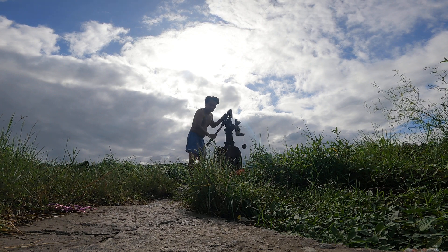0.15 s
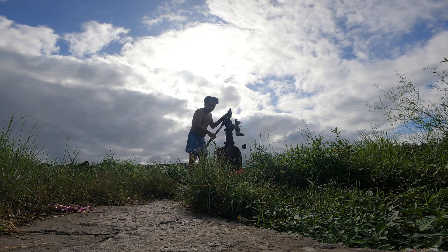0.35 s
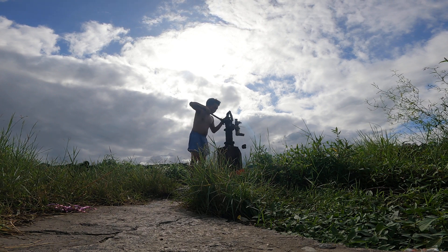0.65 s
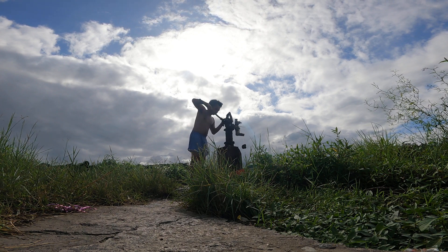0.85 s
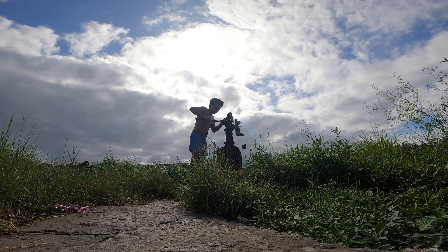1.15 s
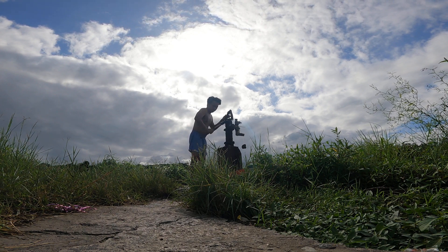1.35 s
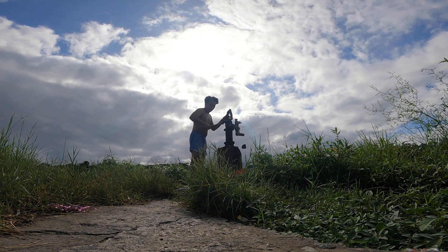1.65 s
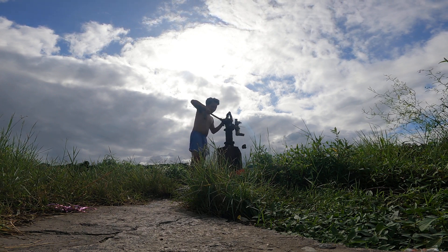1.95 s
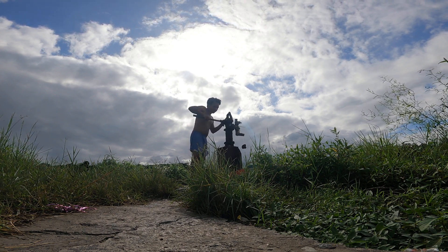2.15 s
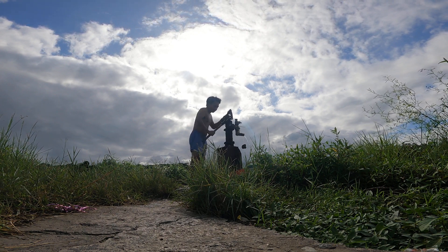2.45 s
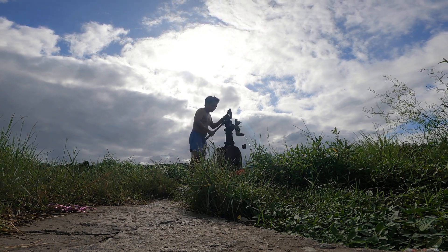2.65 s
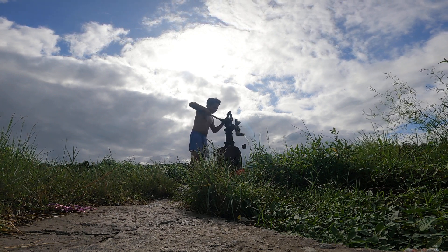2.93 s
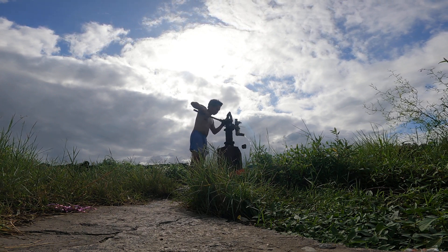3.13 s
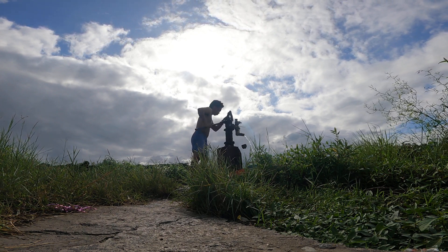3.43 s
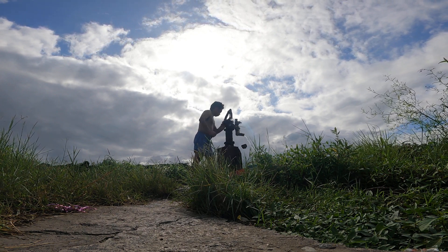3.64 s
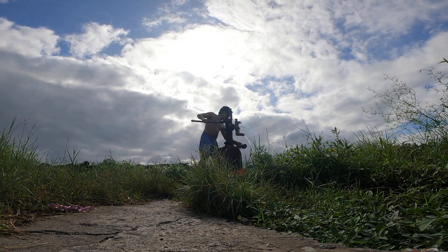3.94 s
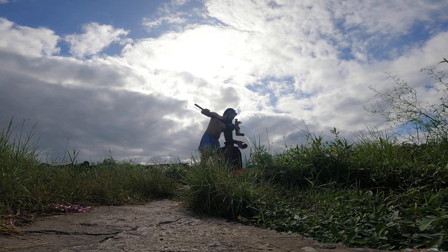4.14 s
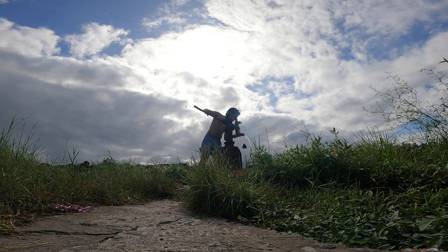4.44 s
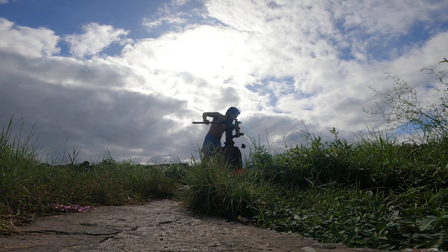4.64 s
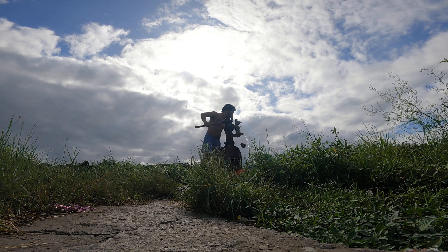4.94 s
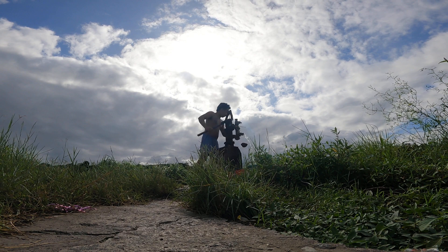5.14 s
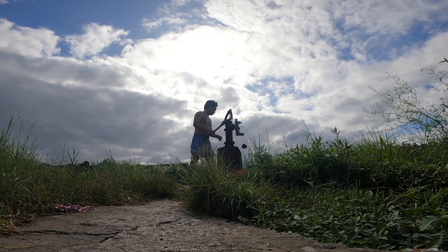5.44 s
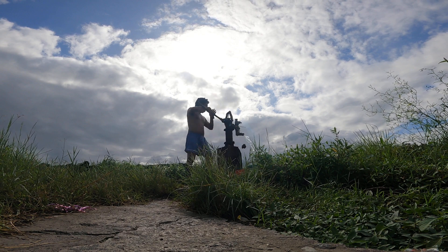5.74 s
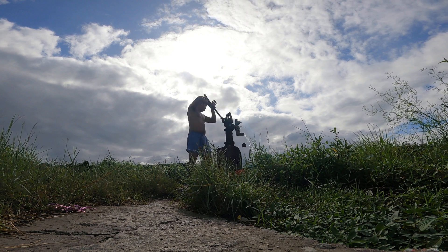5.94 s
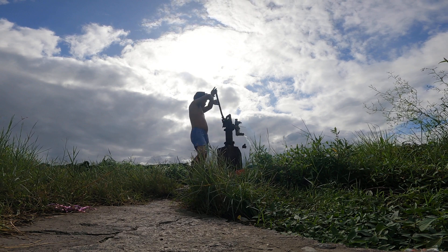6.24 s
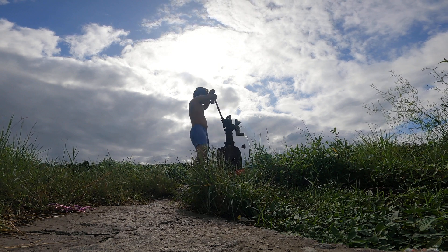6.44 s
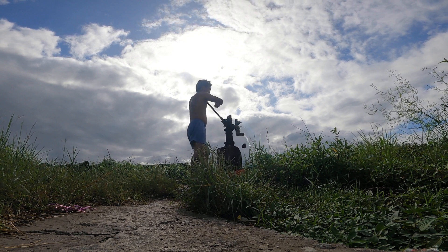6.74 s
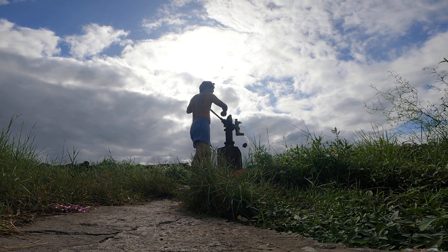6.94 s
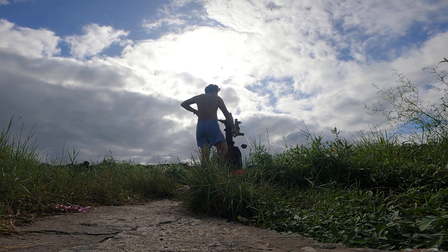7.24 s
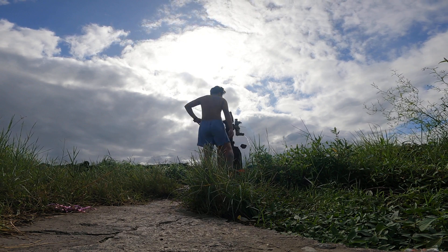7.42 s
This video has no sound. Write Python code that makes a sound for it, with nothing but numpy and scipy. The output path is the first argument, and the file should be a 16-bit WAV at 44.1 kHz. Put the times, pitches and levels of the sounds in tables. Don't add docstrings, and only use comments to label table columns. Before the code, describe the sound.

An old iron hand pump in an open field, dry and nearly echo-free, slightly right of centre, with low wind rumbling at the microphone. After a faint drip, a hard clank at 0.35 s starts a burst of rattling, ticks and hollow low glugs, with a thin squeak near 0.7. More strokes clank around 1.2, then densely from 1.6 to 2.4 and 2.7 to 3.5, with a piercing squeal at 2.9. A short gust comes near 3.45; drops begin pattering on stone from 3.6. Clanks return at 4 to 4.75 while water splats and the air column hums. Around 5.2 to 5.5 the iron pauses: splashes thicken and one big gulp sounds at 5.35. Sharp clanks and a squeak at 5.6 to 5.9, then lighter knocks and a surge of water at 6.4 to 6.9. It ends with drips, trickling and faint high squeaks until 7.6.

```python
import sys
import numpy as np
from scipy import signal
from scipy.fft import rfft, irfft, next_fast_len
from scipy.io import wavfile
from scipy.ndimage import uniform_filter1d

SR = 44100
rng = np.random.default_rng(int(sys.argv[2]) if len(sys.argv) > 2 else 0)


def digitize_waveform(pressure):
    field = np.atleast_2d(pressure).T
    bounded = np.clip(field, -1, 1)
    quanta = np.round(bounded * 32767).astype(np.int16)
    wavfile.write(sys.argv[1], SR, quanta)


def rack_gain(trim_db):
    fader = np.asarray(trim_db, float)
    return 10 ** (fader / 20)


N = 334278

# pitch_hz, level_db, t60_s
LEVER_MODES = [(3300, -8.5, 0.019), (3560, -6.5, 0.079), (3847, -11.5, 0.12), (3820, -7, 0.0071),
               (4226, -2, 0.1), (4420, 1, 0.037), (4620, -1, 0.04), (4814, 0, 0.045), (5240, -11.5, 0.02)]
ROD_MODES = [(6020, -15, .06), (6390, -8, .1), (6565, -9, .15), (6735, 0, .22), (6838, -3, .15),
             (7330, -17, .07)]
PIN_MODES = [(7640, -9, .05), (8120, -7, .08), (8883, -2, .4), (9318, -11, .12), (10280, -15, .06),
             (10620, -17, .08), (11473, -9, .2), (12000, -14, .12), (12526, -6, .25), (13500, -17, .12),
             (14700, -18, .12)]
# freq_hz, level_db
SCRAPE_COLOUR = [(300, -20), (1000, -11), (2000, -14.5), (3200, -10), (4400, 1), (5400, -20.5),
                 (6700, -6.5), (8500, -10), (12000, -22), (15500, -73)]
# time_s, level_db
GRIP = [
    (4.25, 3),
    (4.45, -3.5),
]
# start_s, peak_db,
# rod_ring_db
CLANKS = [(0.3516, -5.5, -5), (0.62, -11.5, -31), (0.6725, -11, -17), (1.1615, -6.5, -18),
          (1.6262, -10.5, -21), (1.7677, -9, 7), (1.7893, -9.5, -30), (1.8648, -11.5, -15), (1.957, -7, -8),
          (2.1839, -14, -14), (2.2657, -7, -20), (2.6862, -7, -24), (2.8303, -10.5, -2.5), (2.851, -14, -39),
          (2.8727, -9.5, -39), (1.6135, -8.5, -12), (2.9888, -10, -8), (3.3182, -9, -27), (3.3802, -16, -9),
          (3.4375, -14.5, -6), (3.9781, -8, -16.5), (4.0422, -8.5, -20), (4.124, -7.5, -19),
          (4.582, -11.5, -21), (4.672, -8, -14), (4.7332, -13, -3), (5.6356, -11.5, -2), (5.7017, -5.5, -31),
          (5.8496, -6, -3), (6.5863, -13, -11), (5.647, -8.5, -16), (5.869, -9.5, -32), (6.9347, -39, -8),
          (6.7032, -32, -6), (2.692, -14.5, -20), (2.274, -10.5, -11), (1.6195, -9.5, -12),
          (0.4298, -22, -23), (0.462, -20.5, -8), (0.561, -17, -8), (0.5992, -13, -30), (0.707, -16.5, -30),
          (0.812, -22.5, 18), (1.138, -18, -37), (1.2092, -14, 7), (1.259, -24.5, -4), (1.7526, -16.5, -26),
          (2.0389, -24, 3), (2.123, -18.5, -12), (2.225, -16.5, -31), (2.327, -15.5, -10),
          (2.3586, -18, -14), (2.3946, -26, -23), (2.592, -26, -7), (2.753, -16, 2), (3.085, -25.5, 6),
          (3.295, -17, -47), (3.486, -17.5, -4), (3.8773, -24.5, -15), (4.084, -29, -8), (4.5469, -24, -1),
          (4.6495, -20, -20), (6.209, -18, -38), (6.428, -16, -28), (6.558, -15, -28), (6.871, -20, -19),
          (6.9077, -20, -16), (0.3461, -15.5, -24), (0.368, -37, -8), (0.408, -36, -6), (0.479, -40, -14),
          (2.673, -33, -24), (2.681, -13, -8), (2.9042, -8.5, -3), (6.422, -25, -36), (6.615, -22, -11),
          (6.936, -21, -16),
          (0.378, -18.5, -2), (0.391, -21, 1), (0.4487, -23, -18), (0.5068, -27.5, -5), (0.528, -23.5, -38),
         (0.577, -24, -26), (0.631, -11.5, -24), (0.722, -15.5, -25), (0.7766, -24, 0), (0.7928, -29, 7),
         (0.8358, -29.5, 4), (0.8528, -32, 10), (0.9274, -36, -31), (0.996, -35.5, -32), (1.052, -38, -21),
         (1.08, -35, -23), (1.101, -24, -27), (1.124, -24, -29), (1.149, -32, -19), (1.2308, -16.5, -22),
         (1.2737, -28.5, 2), (1.285, -30, -11), (1.377, -41.5, -14), (1.5184, -35, -10), (1.6587, -27.5, 0),
         (1.6761, -34, 2), (1.7081, -28, 6), (1.8018, -10.5, -18), (1.812, -10, -17), (1.8308, -8.5, 1),
         (1.9128, -19, -5), (1.9428, -17, -19), (1.9693, -10.5, -13), (1.9995, -19, -17), (2.0448, -23, 10),
         (2.404, -21, -6), (2.4448, -21, 12), (2.7194, -29, 2), (2.7953, -17.5, -1), (2.9612, -15, 3),
         (3.0033, -12, -2), (3.0465, -15, -8), (3.1074, -27, 17), (3.1715, -32, -17), (3.2082, -37, -27),
         (3.2623, -24.5, -29), (3.3343, -17, -10), (3.4625, -18, -19), (3.544, -28, 11), (4.002, -17, -23),
         (4.18, -24, -8), (4.2174, -22, 17), (4.499, -28.5, -13), (4.749, -12.5, -33), (5.7903, -14.5, -12),
         (5.8214, -10.5, -22), (6.3986, -26, -24), (6.4363, -16, -7), (6.5076, -18, 1),
         (6.5642, -17.5, -17)]


def clanks():
    hz, db, t60 = np.transpose(LEVER_MODES + ROD_MODES + PIN_MODES)[..., None]
    part = np.repeat([0, 1, 2], [len(LEVER_MODES), len(ROD_MODES), len(PIN_MODES)])
    hits = CLANKS
    t, out = np.arange(3600) / SR, np.zeros(N)
    luck = rng.standard_normal((len(hits), 3, len(hz), 1))
    grit, lumps = rng.standard_normal((len(hits), 2, len(t))).transpose(1, 0, 2)
    grit = grit * rack_gain(2.7 * evened(uniform_filter1d(lumps, size=60)))
    decay = rack_gain(-75 * t / t60)
    held_s = rng.uniform(.015, .06, len(hits))
    loose = np.array([.012, .008, .002])[part, None] + .03 * (hz > 13000)
    for (s, peak_db, rod_db), (weight, phase, shift), noise, hold_s in zip(hits, luck, grit, held_s):
        scrape_s = np.interp(peak_db, [-30, -8], [.014, .042])
        attack_s = np.clip(scrape_s / 50 * (1 + weight[0]), .0002, .0009)
        blow = noise * rack_gain(-60 * t / scrape_s) * np.minimum(t / attack_s, 1)

        share_db = np.array([0, rod_db + 8, rod_db - 9])[part, None] + 4.5 * weight
        share_db[part == 2] += np.interp(s, *np.transpose(GRIP))
        stop_s = hold_s * np.array([.45, 1.3, 1.3])[part, None]
        damped = np.clip((stop_s - t) / 0.0014, .04, 1)
        tones = np.cos(2 * np.pi * hz * (1 + loose * shift) * t + 3 * phase)
        rung = (damped * rack_gain(share_db + db) * decay * tones).sum(0)
        rung = signal.fftconvolve(rung, blow[:900])[:len(t)]

        dull_db = np.interp(peak_db, [-30, -8], [-11, -6])
        contact = coloured(blow, [(f, d + dull_db * (not 1500 < f < 8000)) for f, d in SCRAPE_COLOUR])
        sound = contact / abs(contact).max() + rack_gain(-3.0) * rung / abs(rung).max()
        add(out, s - .001, rack_gain(peak_db - 2.0) * sound * np.linspace(1, 0, len(t)))
    return out


# start_s, rise_s, run_s, effort_db, rod_ring_over_effort_db
STROKES = [(0.332, 0.03, 0.3, -38.5, 1.5), (0.45, 0.17, 0.3, -29.5, -12), (1.04, 0.12, 0.12, -26.5, -29),
           (1.587, 0.024, 0.12, -31, -26), (1.73, 0.05, 0.25, -24, -13), (2.089, 0.16, 0.13, -26, -34),
           (2.35, 0.061, 0.064, -27.5, -16), (2.664, 0.017, 0.36, -26.5, -4.5), (2.7, 0.17, 0.099, -25, -7),
           (3.24, 0.062, 0.3, -30.5, -23), (3.6, 0.2, 0.15, -53, 2.5), (3.951, 0.12, 0.18, -26.5, -8.5),
           (4.45, 0.23, 0.21, -30, -11.5), (4.9, 0.31, 0.053, -41, -8), (5.613, 0.069, 0.36, -26, -4.5),
           (5.721, 0.14, 0.014, -22.5, -21), (6.42, 0.068, 0.05, -32, -14), (6.11, 0.13, 0.079, -31, -19),
           (6.37, 0.052, 0.13, -29, -8), (6.47, 0.12, 0.11, -30, -13), (6.7, 0.27, 0.05, -33, -7.5)]


def effort(rod=False, lag_s=0):
    swing_db, sag_db = 30, 17
    stop_db_per_s, rest_db = (126, -72.5) if rod else (355, -58)
    start, rise, run, db, rod_db = np.transpose(STROKES)[..., None]
    t = np.arange(0, N + 100, 100) / SR
    late = t - lag_s - start - rise
    after_db = sag_db * late / np.maximum(run, .01) + stop_db_per_s * np.maximum(late - run, 0)
    lost_db = np.maximum(-swing_db * late / np.maximum(rise, .01), after_db)
    level_db = summed(*(db + rod * rod_db - lost_db), rest_db)
    return np.interp(np.arange(N) / SR, t, level_db)


def rattle():
    out, frames = 0, np.arange(0, N + 900, 900)
    t = np.arange(500) / SR
    density = signal.oaconvolve(abs(taps(130, 3)), rack_gain(-60 * t / .016))[:N]
    knocks = np.clip(density, .04, 2.2) * rng.standard_normal(N)
    play_db, rod_db = effort(), effort(rod=True)
    pin_db = rod_db + curve(GRIP)
    # modes, drive in dB, blur of each mode, trim in dB
    groups = ((LEVER_MODES, play_db, 5.5, -6.5), (ROD_MODES, rod_db, 1.2, -2.5),
              (PIN_MODES[:9], pin_db, 2.8, -11.5))
    for modes, drive_db, blur, trim_db in groups:
        rung = 0
        for hz, db, t60 in modes:
            luck_db = (3 + .6 * blur) * rng.standard_normal(len(frames))
            chance = np.interp(np.arange(N), frames, rack_gain(luck_db))
            rung = rung + rack_gain(db) / np.sqrt(t60) * evened(ring(knocks * chance, hz, blur / t60))
        faint_db = np.clip(play_db + 56.0, -12, 0)
        out = out + evened(rung) * rack_gain(drive_db + trim_db + faint_db)
    grit = evened(coloured(evened(knocks) + 0.75 * evened(taps(2700, 4.2)), SCRAPE_COLOUR))
    return out + grit * rack_gain(play_db - 9.0)


# start_s, length_s, pitch_hz, level_db, t60_s
SQUEAKS = [(0.712, 0.044, 3670, -26.5, 0.56), (0.76, .08, 1150, -54, .6), (1.0, 0.053, 3690, -46, 0.31),
           (1.165, .05, 6390, -30, .3), (1.257, 0.05, 3480, -34, .15), (1.773, 0.17, 3675, -28.5, 0.74),
           (2.04, 0.08, 3520, -46, .8), (2.118, 0.067, 3660, -29.5, 0.68), (2.45, .055, 1110, -49, .9),
           (2.9, 0.115, 3560, -17, 0.4), (3.0, 0.3, 3480, -46, 1.4), (5.385, 0.045, 262, -18, 0.5),
           (5.795, 0.078, 3560, -26, 0.88), (6.164, 0.022, 1277, -40, .5), (6.164, .018, 2550, -44, .5),
           (6.165, 0.018, 3880, -34, .5), (6.41, 0.051, 3580, -32.5, 0.77), (6.582, 0.074, 4220, -22, 0.22),
           (7.119, 0.043, 10060, -57, 0.86), (7.157, 0.082, 7860, -34.5, 0.97),
           (7.297, 0.11, 10970, -43, 0.5), (7.297, 0.11, 13000, -60, .8)]


def squeaks():
    out = np.zeros(N)
    for s, length_s, hz, db, t60 in SQUEAKS:
        t = np.arange(0, length_s, 1 / SR)
        waver, throb = evened(uniform_filter1d(rng.standard_normal((2, len(t))), size=300))
        tone = np.sin(2 * np.pi * np.cumsum(hz * (1 + 0.0037 * waver)) / SR)
        level = rack_gain(db + 2.5 + 3.3 * throb - 60 * t / t60)
        add(out, s, level * tone * signal.windows.tukey(len(t), .4))
    return out


# start_s, peak_db, pitch_hz
GLUGS = [(0.395, -24.5, 218), (0.7, -22, 195), (0.741, -23.5, 202), (0.873, -25.5, 215), (0.913, -25, 199),
         (1.085, -24.5, 203), (1.215, -26, 209), (1.236, -17, 222), (1.801, -28.5, 214), (1.975, -25, 234),
         (2.368, -21.5, 223), (2.757, -28, 171), (2.833, -28, 380), (3.203, -34.5, 181), (3.474, -24, 248),
         (3.714, -37, 397), (4.018, -27, 353), (4.092, -25, 174), (4.259, -28, 182), (4.764, -20.5, 358),
         (5.209, -18.5, 245), (5.274, -25, 277), (5.346, -8.5, 263.7), (5.479, -19, 250.3),
         (5.683, -28.5, 326), (5.763, -23.5, 304), (5.798, -38, 328), (5.87, -26, 230), (6.919, -28, 240),
         (6.939, -25, 222), (5.1, -37, 205), (5.24, -30, 268), (5.339, -18, 383), (6.759, -32.5, 193),
         (1.057, -30.5, 201)]
# time_s, pitch_hz
COLUMN_PITCH = [(0.0, 182), (0.71, 197), (2.5, 250), (2.8, 382), (3.5, 351), (3.62, 230), (3.95, 232),
                (4.05, 344), (4.39, 240), (4.73, 293), (5.07, 226), (5.39, 275), (5.82, 281), (7.58, 265)]


def barrel():
    t, out = np.arange(6000) / SR, np.zeros(N)
    slap_band = signal.butter(2, [280, 1100], "band", fs=SR)
    slaps = signal.lfilter(*slap_band, rng.standard_normal((len(GLUGS), len(t))))
    for (s, db, hz), slap in zip(GLUGS, evened(slaps)):
        turns = hz * (t + 0.21 * 0.0062 * (1 - np.exp(-t / 0.033)))
        stays_s = np.interp(db, [-30, -8], [.045, .085])
        closing = np.clip((stays_s - t) / 0.0057, .05, 1)
        shape = np.minimum(t / 0.0055, 1) * rack_gain(-60 * t / 0.17) * closing
        wet = rack_gain(-18.5 - 60 * t / 1.2) * slap
        add(out, s - .003, rack_gain(db) * shape * (np.sin(2 * np.pi * turns) + wet))
    hz = curve(COLUMN_PITCH)
    hum = resonate(resonate(rng.standard_normal(N), hz, 45), hz, 90)
    low_hum = ring(rng.standard_normal(N), 230.4, 33)
    return out + evened(hum) * rack_gain(stirring()) + evened(low_hum) * rack_gain(effort() - 14.5)


def stirring():
    rest_db, share, level_db, stir_s = -57.5, 0.95, -18, 0.07
    s, db, _ = np.transpose(GLUGS)[..., None]
    t = np.arange(0, N + 100, 100) / SR
    lost_db = 10 * np.maximum((t - s) / stir_s, (s - t) / 0.027)
    return np.interp(np.arange(N) / SR, t, summed(*(level_db + share * db - lost_db), rest_db))


# start_s, peak_db, pitch_hz
SPLATS = [(0.908, -37, 1230), (1.915, -25, 2480), (3.522, -28.5, 2190), (3.774, -29, 2140),
          (3.809, -33, 1960), (3.875, -31, 1670), (4.236, -29.5, 1980), (4.261, -27, 2190),
          (4.397, -31, 1950), (4.802, -29, 928), (4.977, -26, 1830), (5.04, -34, 2150),
          (5.127, -30.5, 1080), (5.176, -23.5, 1900), (5.208, -21, 1800), (5.24, -23.5, 1210),
          (5.345, -20.5, 1780), (5.381, -19, 2240), (5.404, -22, 1190), (5.471, -21, 1200),
          (5.477, -24, 1060), (6.485, -21.5, 1440), (6.517, -22.5, 1670), (6.878, -27, 1095),
          (7.092, -26, 1870), (7.171, -29, 2100), (7.275, -33.5, 1260), (7.326, -25, 1215),
          (7.392, -26.5, 1820), (7.469, -29, 2170), (1.312, -39, 1460), (3.59, -32, 2700),
          (3.843, -34, 1980), (4.006, -30, 2090), (4.292, -39, 977), (4.545, -34, 1710), (4.567, -35, 2180),
          (4.951, -34, 2030), (5.019, -31, 2160), (5.096, -38, 630), (5.174, -27, 1140),
          (5.194, -27.5, 583), (5.262, -32, 1310), (5.344, -24, 1120), (5.369, -29, 1110),
          (5.564, -30.5, 1210), (5.765, -28, 960), (5.978, -28, 2580), (6.143, -47, 1680),
          (6.387, -49, 977), (6.421, -29, 1220), (6.585, -24.5, 1570), (6.909, -25.5, 1760),
          (6.936, -26, 1740), (7.035, -37, 1060), (7.151, -33.5, 1100), (7.414, -33, 2190),
          (7.43, -42, 1190)]
# time_s, level_db
FLOW = [(0.0, -65), (1.5, -61.5), (3.13, -57.5), (3.9, -56), (4.38, -53), (5.05, -54), (5.3, -48),
        (6.1, -49), (6.36, -52), (6.5, -42), (6.82, -50), (7.58, -52)]
# freq_hz, level_db_per_hz
SPRAY_COLOUR = [(240, -26.5), (400, 3), (452, 0), (761, -22), (972, -4), (1300, -8), (2030, -9.5),
                (2630, -12), (4490, -13.5), (11100, -25), (14200, -48), (15700, -58)]


def water():
    out, t = np.zeros(N), np.arange(1500) / SR
    fizz = coloured(rng.standard_normal((len(SPLATS), len(t))), SPRAY_COLOUR)
    for (s, db, hz), noise in zip(SPLATS, evened(fizz)):
        add(out, s - .001, rack_gain(db + 1.0) * bubble(hz, cycles=7.3))
        add(out, s - .001, rack_gain(db - 14.0) * noise * rack_gain(-60 * t / 0.046))
    drops = 0
    for hz in np.geomspace(900, 9000, 20):
        drops = drops + signal.oaconvolve(taps(14, 3), bubble(hz, cycles=2.5))[:N]
    drops = evened(coloured(drops, SPRAY_COLOUR))
    spray = patchy_noise(SPRAY_COLOUR, size=256, patchy_db=2.6, flicker_db=3.2)[0]
    gush_db = -44.5 + 0.95 * (effort(lag_s=0.00057) + 30)
    return out + rack_gain(summed(curve(FLOW), gush_db)) * (rack_gain(-16.5) * drops + rack_gain(3.0) * spray)


def bubble(hz, cycles):
    u = np.arange(0, 2.5 * cycles, hz / SR)
    tone = np.sin(2 * np.pi * u * (1 + 0.0011 * u))
    return tone * np.exp(-2.2 * u / cycles) * np.minimum(u / 0.15, 1)


# start_s, peak_db
SPATTER = [(0.199, -38), (0.2456, -34), (0.9582, -44), (0.9696, -40), (1.442, -43), (2.5571, -50),
           (3.59, -28), (3.6122, -36), (3.65, -32.5), (3.7053, -31), (3.7444, -33), (3.773, -31.5),
           (3.8077, -26), (3.8314, -31), (3.844, -24.5), (3.937, -32), (4.2917, -34), (4.3246, -49),
           (4.353, -38), (4.4454, -35), (4.802, -21), (4.8758, -23.5), (4.916, -29), (4.9511, -29),
           (5.0399, -32), (5.0965, -29), (5.174, -28), (5.249, -25), (5.3216, -45), (5.3407, -22.5),
           (5.38, -40), (5.4395, -34), (5.47, -28), (5.5298, -37), (5.5587, -25), (5.5812, -23.5),
           (5.9264, -36), (5.948, -31), (6.0854, -25.5), (6.145, -33), (6.3729, -49), (6.3867, -39),
           (6.6584, -21), (6.7705, -39), (6.7894, -27), (6.855, -47), (7.0354, -40), (7.0898, -48),
           (7.15, -33), (7.1694, -26), (7.2285, -52), (7.273, -29), (7.301, -41), (7.3256, -27),
           (7.389, -33), (7.414, -28), (7.432, -29), (7.469, -25.5), (7.5467, -40)]
# freq_hz, level_db
BURST_COLOUR = [(600, -18), (2000, 1.5), (4500, 2.5), (7500, 1), (10000, -26), (14000, -42), (15800, -40)]


def spatter():
    out, t = np.zeros(N), np.arange(1000) / SR
    fizz = coloured(rng.standard_normal((len(SPATTER), len(t))), BURST_COLOUR)
    for (s, db), noise in zip(SPATTER, evened(fizz)):
        add(out, s - .001, rack_gain(db - 10.5 - 60 * t / 0.05) * noise)
    return out


# start_s, peak_db, pitch_hz
THUMPS = [
    (1.27, -33, 58),
    (4.84, -32.5, 115),
    (5.194, -27.5, 76.4),
    (5.88, -30, 107),
]


def thumps():
    t, out = np.arange(8000) / SR, np.zeros(N)
    for s, db, hz in THUMPS:
        add(out, s, rack_gain(db + 7.0 - 60 * t * hz / 9) * np.sin(2 * np.pi * hz * t))
    return out


# freq_hz, level_db
SCATTER_COLOUR = [(200, -26), (700, -14), (1400, -11), (2800, -9), (5000, -17), (9500, -19), (13000, -2)]


def scattered(x):
    t = np.arange(2500) / SR
    echoes = rng.choice([-1., 1.], len(t)) * (rng.random(len(t)) < .05)
    tail = echoes * (t > .002) * rack_gain(-60 * t / 0.026)
    return coloured(signal.oaconvolve(x, tail / np.linalg.norm(tail))[:N], SCATTER_COLOUR)


# time_s, level_db
GUSTS = [
    (0.0, -50.5),
    (1.4, -49),
    (1.55, -57),
    (2.56, -59.5),
    (3.45, -44.5),
    (3.63, -63),
    (4.79, -45.5),
    (5.59, -57),
    (6.5, -56),
    (7.58, -59),
]
# freq_hz, level_db_per_hz
RUMBLE_COLOUR = [(8.8, -35), (15, -16), (59, 1.5), (114, 2.5), (231, -3), (313, -39.5), (374, -29),
                 (700, -32.5), (910, -51), (1540, -120)]
# freq_hz, likeness_0_to_1
WIND_LIKENESS = [(20, .5), (60, .85), (150, .99)]


def wind():
    both, apart = patchy_noise(RUMBLE_COLOUR, size=2048, patchy_db=2, flicker_db=2.3, channels=2)
    hz, same = np.transpose(WIND_LIKENESS)
    same = np.clip(same, 0, .999)
    apart = coloured(apart, list(zip(hz, 10 * np.log10((1 - same) / (1 + same)))))
    heave_db = -45 + 0.27 * (effort(lag_s=0.005) + 30)
    return rack_gain(summed(curve(GUSTS), heave_db) + 5.5) * np.array([both + apart, both - apart])


def evened(x):
    return x / np.sqrt(np.mean(x ** 2) + 1e-20)


def read(points, hz):
    f, value = np.transpose(points)
    return np.interp(np.log(hz + 1), np.log(f + 1), value)


def curve(rows, axis=1):
    rows = np.array(rows)
    return np.interp(np.arange(N) / SR, rows[:, 0], rows[:, axis])


def summed(*db):
    return 10 * np.log10(sum(rack_gain(d) ** 2 for d in db))


def add(mix, s, sound):
    part = mix[max(round(s * SR), 0):][:len(sound)]
    part += sound[:len(part)]


def coloured(x, points):
    n = x.shape[-1]
    size = next_fast_len(n)
    gain = rack_gain(read(points, np.fft.rfftfreq(size, 1 / SR)))
    return irfft(rfft(x, size) * gain, size)[..., :n]


def resonate(x, hz, width):
    turn = np.exp(2j * np.pi * np.cumsum(hz * np.ones(len(x))) / SR)
    r = np.exp(-np.pi * width / SR)
    return 2 * (turn * signal.lfilter([1 - r], [1, -r], x / turn)).real


def ring(x, hz, width):
    x = signal.lfilter(*signal.iirpeak(hz, hz / width, SR), x)
    return signal.lfilter(*signal.iirpeak(hz, hz / (width + 250), SR), x)


def taps(per_s, spread_db):
    size = rack_gain(spread_db * np.minimum(rng.exponential(1, N), 4)) * rng.choice([-1., 1.], N)
    return size * (rng.random(N) < per_s / SR)


def patchy_noise(points, size, patchy_db, flicker_db, channels=1):
    frames, hz = 4 * N // size + 5, np.fft.rfftfreq(size, 1 / SR)
    a, b, patches = rng.standard_normal((3, channels, frames, len(hz))).transpose(0, 1, 3, 2)
    patches = evened(uniform_filter1d(uniform_filter1d(patches, size=4, axis=1), size=16, axis=2))
    flicker = evened(uniform_filter1d(rng.standard_normal(frames), size=4))
    level_db = read(points, hz)[:, None] + patchy_db * patches + flicker_db * flicker
    z = (a + 1j * b) * rack_gain(level_db)
    return evened(signal.istft(z, nperseg=size, noverlap=3 * size // 4)[1][:, :N])


# freq_hz, left_minus_right_db
LEAN = [(100, 0), (700, -1.3), (1400, -2.2), (5000, .5), (11200, 0), (12500, -15)]


def scene():
    pump = clanks() + rattle() + squeaks() + barrel() + water() + spatter() + thumps()
    hz, lean_db = np.transpose(LEAN)
    left = coloured((pump + 2 * np.roll(pump, 1)) / 3, list(zip(hz, lean_db / 2)))
    right = coloured(pump, list(zip(hz, -lean_db / 2)))
    side = scattered(pump)
    return np.array([left + side, right - side]) + wind()


def roll_off(x):
    return signal.sosfilt(signal.butter(12, 15750, fs=SR, output="sos"), x)


def record(dry):
    mix = coloured(dry, [(13200, -0.5), (15600, -18), (15800, -67)])
    return roll_off(mix)


dry = scene()
out = record(dry)
digitize_waveform(out)
```